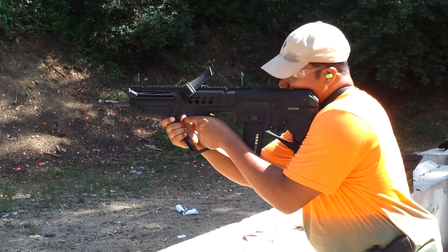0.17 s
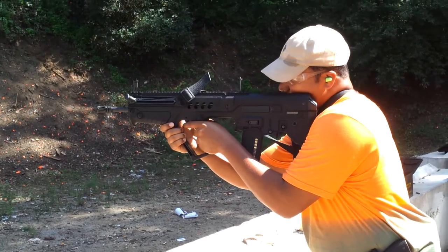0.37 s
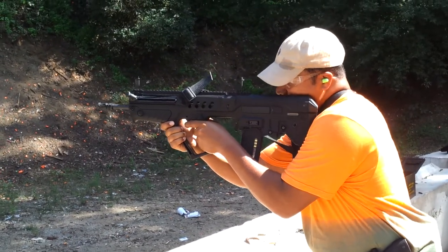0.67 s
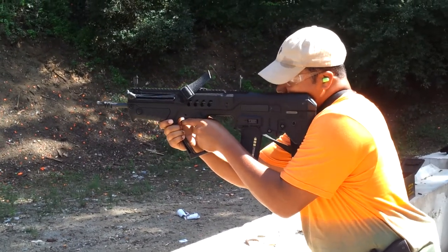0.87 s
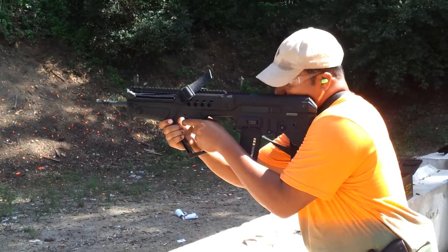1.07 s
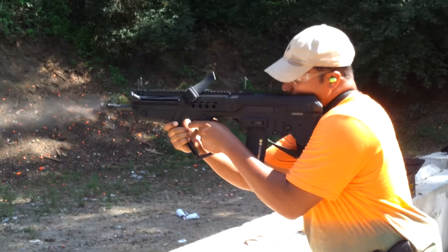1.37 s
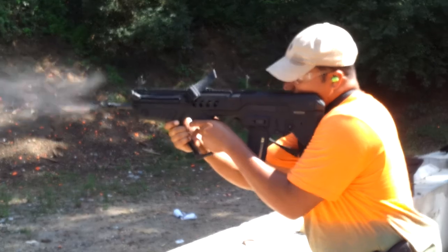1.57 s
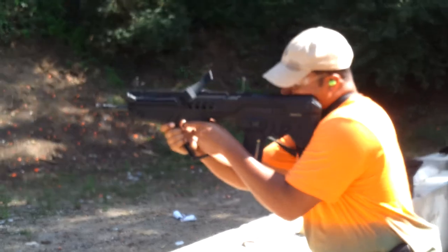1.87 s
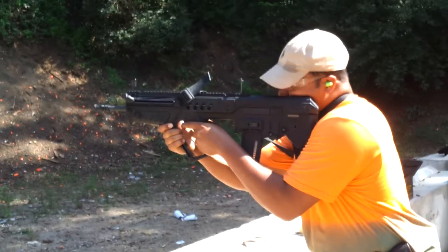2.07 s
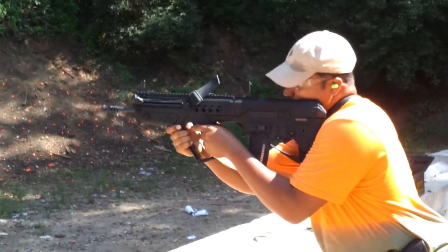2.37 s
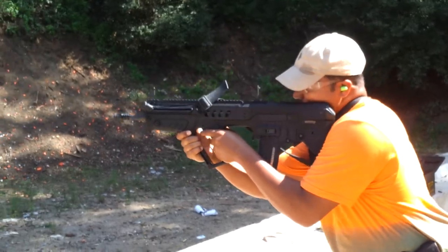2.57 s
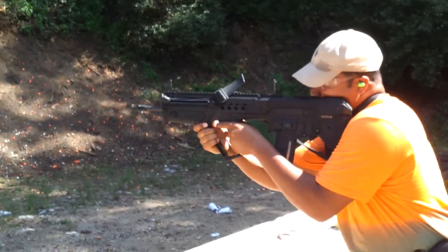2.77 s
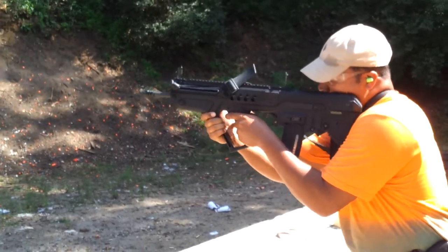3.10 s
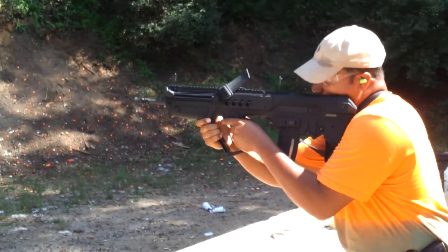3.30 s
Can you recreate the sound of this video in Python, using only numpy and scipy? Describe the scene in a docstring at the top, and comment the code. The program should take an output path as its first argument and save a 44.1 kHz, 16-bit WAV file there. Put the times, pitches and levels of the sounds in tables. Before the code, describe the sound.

Rifle fire at an outdoor range. It opens on the fading roar of two shots just fired; a single sharp blast comes at 0.6 s. From 1.0 s shots run about five a second, with a near-double at 1.4 s, until the cut at about 3.4 s. Dull ground echoes and hissing tree reverberation fill the gaps. The close microphone overloads badly, squashing everything into a dense, crunchy roar.

```python
"""One first hears the dying roar of two rifle shots just fired, then further shots, about five a second.
The place is an outdoor range: each shot is a sharp blast, an N-wave pulse with bursts of bright noise.
The same run of dull echoes from ground and bank follows, then a long hissing tail from the trees.
Echoes are short noise bands; scatter and tail are coloured noise, alike from shot to shot in the lows.
The close microphone is driven far into overload and its gain control flattens the run into a dense roar."""
import sys
import numpy as np
from scipy import signal
from scipy.fft import rfft, irfft, next_fast_len
from scipy.io import wavfile
from scipy.ndimage import uniform_filter1d

SR = 44100
rng = np.random.default_rng(int(sys.argv[2]) if len(sys.argv) > 2 else 0)


def persist_wave(psi):
    """Save psi, clipped to +-1, as 16-bit WAV."""
    counts = np.round(np.clip(psi, -1, 1) * 32767).astype(np.int16)
    wavfile.write(sys.argv[1], SR, np.atleast_2d(counts).T)


N = 151704
LEAD = SR // 2   # samples of run-in, which hold the two shots before time zero
SIZE = N + LEAD

# Shots; the one at 1.39 s is on the heels of another, perhaps from a second gun: (time [s], strength [dB])
SHOTS = [(-.265, 1), (-.0633, -3.5), (.6100, -0.5), (1.0134, 3), (1.2070, 9.5), (1.3693, 2), (1.393, 1),
         (1.5625, 2.5), (1.7644, 2), (1.9650, 2.5), (2.1874, 4.5), (2.3942, 2), (2.6176, 3), (2.8226, 3.5),
         (3.0340, 4), (3.2483, 3)]
# Echoes from the bank and slopes: (delay of centre [s], length [s], centre frequency [Hz], level [dB])
ECHOES = [(.013, .016, 520, 11), (.023, .020, 400, 7.5), (.024, 0.04465, 74.54, -2.5),
          (.038, .024, 215, 5.5), (.045, .014, 418, 8.5), (.057, .020, 340, 6), (.071, .022, 470, 6.5),
          (0.076, .030, 185, 0.5), (0.091, .028, 317, 2.5), (.116, .026, 813, 3), (.205, .050, 1477, -5)]
# Spectrum of scatter from the ground and benches close by: (frequency [Hz], relative level per Hz [dB])
NEAR_SPECTRUM = [(30, -38), (45, -30), (68, 1), (130, -0.5), (200, -5.5), (330, -2.5), (520, 3.5),
                 (700, -10), (1000, 3.5), (1550, -1.5), (2200, -5), (3400, -9), (5000, -4), (6200, -5.5),
                 (7500, -25), (16000, -41)]
# Spectrum of the tail from the trees: (frequency [Hz], relative level per Hz [dB])
TREE_SPECTRUM = [(30, -42), (45, -36), (68, -11), (150, -7), (330, 4), (600, 4), (900, 6.5), (1100, -1.5),
                 (1600, -0.5), (2100, -4), (3200, -2), (4500, 4.5), (5700, 7.5), (6500, 3.5), (7600, -6.5),
                 (11000, -14.5), (13000, -22), (16000, -38)]
# Swells of the tail where the trees stand thick: (delay [s], spread [s], rise [dB])
TREE_SWELLS = [(.20, 0.021, 0.88), (.425, 0.018, 1.6), (.60, .02, 1.9)]
# Overall level, which wanders: (time [s], level [dB])
LEVEL = [(0, -1.5), (.6, -2), (1.199, -2), (1.599, 0), (2.05, -0.2), (2.25, -0.86), (3.398, -0.57)]
# Tone colour of the recorder: (frequency [Hz], gain [dB])
COLOUR = [(20, -18), (40, -18), (65, -9), (200, -3.5), (450, -2.5), (1000, -4), (3000, 0.5), (5700, -1),
          (8000, -1.5), (11500, 1.5), (13500, -1.5), (16000, -1.5)]

# Source levels are in dB above the overload point, for a shot of 0 dB strength.
BLAST_S, BLAST_DB = 0.00079, 30.5
CRACK_LOW_HZ, CRACK_HIGH_HZ, CRACK_T60_S, CRACK_DB = 2400, 11800, 0.16, 12.5
PORT_HZ, PORT_WIDTH_HZ, PORT_T60_S, PORT_DB = 5300, 900, 0.049, 14
ECHO_WIDTH_OCT = 0.87
NEAR_DB, NEAR_T60_S = 15.5, 0.43
TAIL_DB, TAIL_RISE_S, TAIL_LOW_T60_S, TAIL_HIGH_T60_S = 9.5, 0.023, 1.63, 1.116
REPEAT_BELOW_HZ = 2920   # here half the power repeats from shot to shot

KNEE = 5.9   # hardness of the overload
HASH_LOW_HZ, HASH_HIGH_HZ, HASH_DB = 4230, 7120, -6.5   # shrill hiss on the overloaded peaks
SMEAR_HZ, SMEAR_SHARPNESS = 5200, 0.24   # all-pass pole: frequency and radius
AGC_THRESHOLD_DB, AGC_SLOPE = -9.5, 0.87   # slope: dB of cut per dB above threshold
AGC_ATTACK_S, AGC_RELEASE_DB_PER_S = 0.0031, 53
PEAK_LIMIT = .95   # ceiling ahead of the top cut, as a share of full scale
CUTOFF_HZ = 15720


def trigger():
    """Impulse train: each shot is a single click whose height is its strength."""
    clicks = np.zeros(SIZE)
    for time, db in SHOTS:
        clicks[LEAD + int(time * SR)] += from_db(db)
    return clicks


def blast(clicks):
    """Shock wave and resonance: a pressure ramp, a crack of escaping gas and a shrill microphone port."""
    t = np.arange(LEAD) / SR
    n_wave = from_db(BLAST_DB) * np.linspace(-1, 1, int(BLAST_S * SR))

    crack = band_noise(CRACK_LOW_HZ, CRACK_HIGH_HZ, SIZE)
    crack *= fresh_envelope(clicks, dying(t, CRACK_T60_S))

    # the ringing of the port is heard as a narrow band of dying noise
    port = band_noise(PORT_HZ - PORT_WIDTH_HZ / 2, PORT_HZ + PORT_WIDTH_HZ / 2, SIZE)
    port *= fresh_envelope(clicks, dying(t, PORT_T60_S))
    return play(clicks, n_wave) + from_db(CRACK_DB) * crack + from_db(PORT_DB) * port


def bank_echoes(clicks):
    """Reflection from rough slopes: delayed short dull bursts, the same after every shot."""
    response = np.zeros(SR)
    half_band = 2 ** (ECHO_WIDTH_OCT / 2)
    for delay, length, hz, db in ECHOES:
        size = int(length * SR)
        start = max(int((delay - length / 2) * SR), 0)
        burst = np.hanning(size) * band_noise(hz / half_band, hz * half_band, size)
        response[start:start + size] += from_db(db) * rms_one(burst)
    return play(clicks, response)


def near_scatter(clicks):
    """Diffuse scattering: the ground and benches close by return the blast as briefly decaying noise."""
    t = np.arange(2 * SR) / SR
    envelope = from_db(NEAR_DB) * dying(t, NEAR_T60_S)
    return scattered(clicks, NEAR_SPECTRUM, envelope, envelope)


def tree_tail(clicks):
    """Multiple scattering: trees return a long tail that swells where they stand thick; treble dies first."""
    t = np.arange(2 * SR) / SR
    swells_db = sum(db * np.exp(-((t - delay) / spread) ** 2) for delay, spread, db in TREE_SWELLS)
    envelope = from_db(TAIL_DB + swells_db) * (1 - np.exp(-t / TAIL_RISE_S))
    low_envelope = envelope * dying(t, TAIL_LOW_T60_S)
    high_envelope = envelope * dying(t, TAIL_HIGH_T60_S)
    return scattered(clicks, TREE_SPECTRUM, low_envelope, high_envelope)


def scattered(clicks, spectrum, low_envelope, high_envelope):
    """Coherence: low sound returns alike after each shot, while moving air scrambles the treble."""
    low, high = coloured_noise(spectrum, SIZE)
    repeating = play(clicks, low[:len(low_envelope)] * low_envelope)
    return repeating + high * fresh_envelope(clicks, high_envelope)


def scene():
    """Superposition: pressure at one microphone, in units of its overload point, on two equal channels."""
    clicks = trigger()
    mono = blast(clicks) + bank_echoes(clicks) + near_scatter(clicks) + tree_tail(clicks)
    mono = mono[LEAD:]
    return np.stack([mono, mono])


def overload(x):
    """Saturation: the input stage flattens peaks, hisses while pinned, and its phase lag roughens the tops."""
    fine = signal.resample_poly(x, 2, 1, axis=1)   # twice the rate, to curb aliasing
    fine = fine / (1 + np.abs(fine) ** KNEE) ** (1 / KNEE)
    flat = signal.resample_poly(fine, 1, 2, axis=1)

    pinned = uniform_filter1d(1.0 * (np.abs(x[0]) > 2), size=32)   # beyond twice the overload point
    flat = flat + from_db(HASH_DB) * pinned * band_noise(HASH_LOW_HZ, HASH_HIGH_HZ, N)

    # all-pass filter: shifts phase, keeps level
    r = SMEAR_SHARPNESS
    poles = [1, -2 * r * np.cos(2 * np.pi * SMEAR_HZ / SR), r * r]
    return signal.lfilter(poles[::-1], poles, flat)


def gain_control(x):
    """Compression by feed-forward: turns down within milliseconds when loud and recovers slowly."""
    power = uniform_filter1d(x[0] ** 2, size=128)
    level_db = 10 * np.log10(np.maximum(power, 1e-12))
    wanted_cut_db = AGC_SLOPE * np.maximum(level_db - AGC_THRESHOLD_DB, 0)

    # a running maximum on a rising ramp makes the cut fall no faster than the release rate
    recovery_db = AGC_RELEASE_DB_PER_S * np.arange(N) / SR
    cut_db = np.maximum.accumulate(wanted_cut_db + recovery_db) - recovery_db

    r = np.exp(-1 / (AGC_ATTACK_S * SR))
    smooth_cut_db, _ = signal.lfilter([1 - r], [1, -r], cut_db, zi=[r * cut_db[0]])
    return x * from_db(-smooth_cut_db)


def record(dry):
    """Recording chain: overload, gain control, wandering level, tone colour, peak ceiling, steep top cut."""
    x = gain_control(overload(dry))
    x = x * from_db(np.interp(np.arange(N) / SR, *np.transpose(LEVEL)))

    size = next_fast_len(SIZE)
    hz = np.maximum(np.fft.rfftfreq(size, 1 / SR), 1)
    x = irfft(rfft(x, size) * from_db(at_hz(COLOUR, hz)), size)[:, :N]

    x = np.clip(x, -PEAK_LIMIT, PEAK_LIMIT)
    top_cut = signal.firwin(801, CUTOFF_HZ, fs=SR)
    return signal.fftconvolve(x, top_cut[None], "same", axes=1)


def coloured_noise(spectrum, size):
    """Spectral shaping: noise split into repeating lows and scrambled treble, of unit rms together."""
    fast = next_fast_len(size)
    hz = np.maximum(np.fft.rfftfreq(fast, 1 / SR), 1)
    gain = rms_one(from_db(at_hz(spectrum, hz)))
    alike = 1 / (1 + (hz / REPEAT_BELOW_HZ) ** 3)   # share of the power that repeats
    parts = []
    for share in (alike, 1 - alike):
        white = rfft(rng.standard_normal(fast))
        parts.append(irfft(white * gain * np.sqrt(share), fast)[:size])
    return parts


def band_noise(low, high, size):
    """Band-pass filtering: a band of noise with unit rms."""
    sos = signal.butter(2, [low, min(high, SR / 2 - 1)], "band", fs=SR, output="sos")
    noise = signal.sosfilt(sos, rng.standard_normal(size + LEAD))
    return rms_one(noise[LEAD:])   # without the filter's onset


def play(clicks, response):
    """Convolution: every click sounds the response at its own strength."""
    out = np.zeros(SIZE + len(response))
    for i in np.flatnonzero(clicks):
        out[i:i + len(response)] += clicks[i] * response
    return out[:SIZE]


def fresh_envelope(clicks, envelope):
    """Incoherent addition: the powers of unrelated noises add, one started by every click."""
    return np.sqrt(play(clicks ** 2, envelope ** 2))


def dying(t, t60):
    """Exponential decay: the level falls 60 dB in t60 seconds."""
    return np.exp(-np.log(1000) * t / t60)


def from_db(db):
    """Decibel law: 20 dB is a tenfold amplitude."""
    return 10 ** (np.asarray(db) / 20)


def rms_one(x):
    """Normalisation: scale to unit rms."""
    return x / np.sqrt(np.mean(x ** 2) + 1e-20)


def at_hz(points, hz):
    """Logarithmic pitch axis: read a table by linear interpolation in log frequency."""
    f, value = np.transpose(points)
    return np.interp(np.log(hz), np.log(f), value)


dry = scene()
out = record(dry)
persist_wave(out)
```